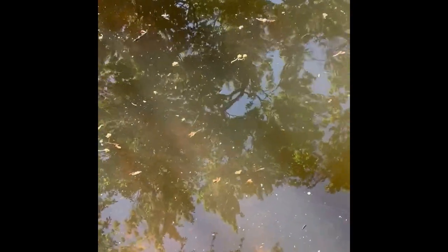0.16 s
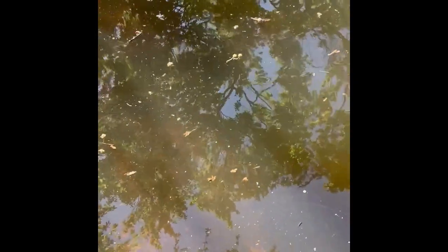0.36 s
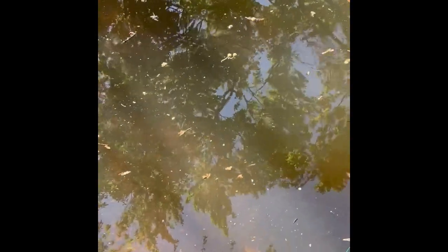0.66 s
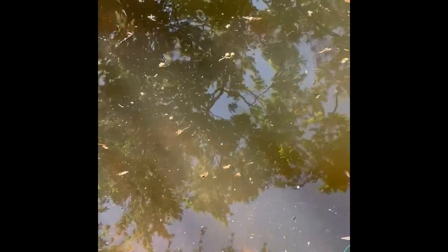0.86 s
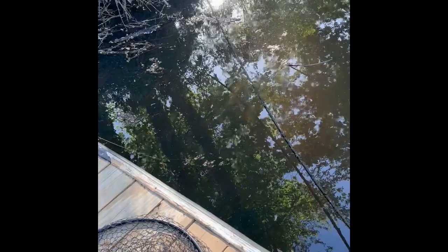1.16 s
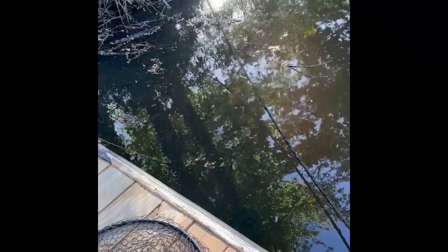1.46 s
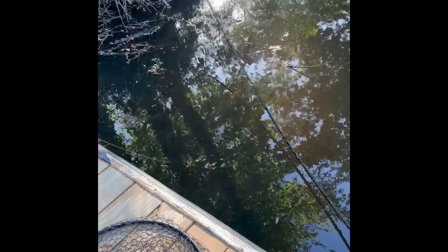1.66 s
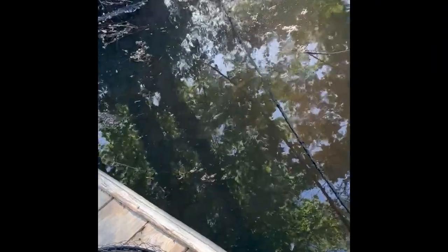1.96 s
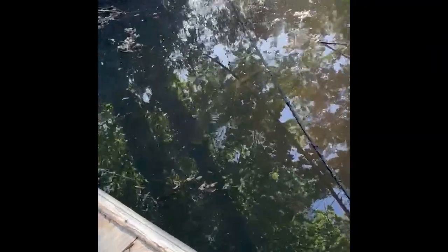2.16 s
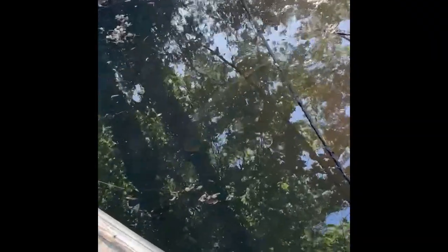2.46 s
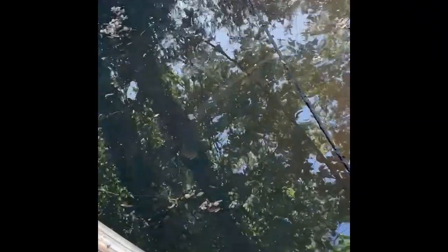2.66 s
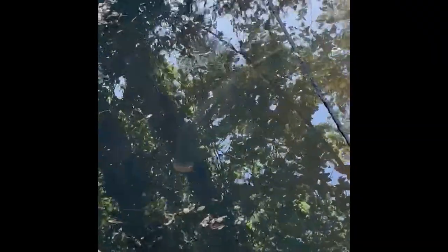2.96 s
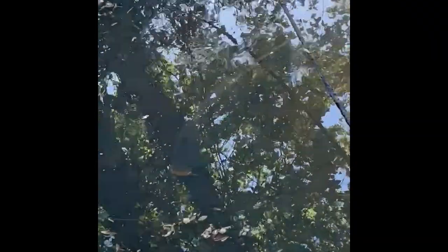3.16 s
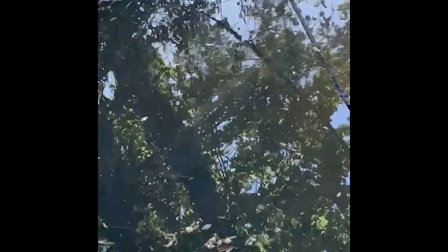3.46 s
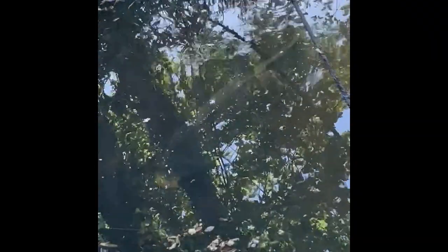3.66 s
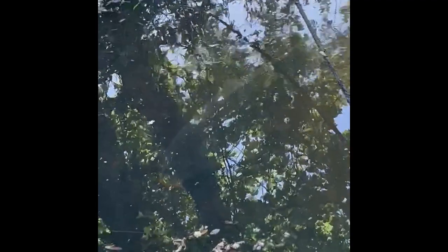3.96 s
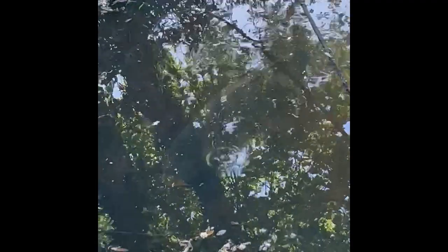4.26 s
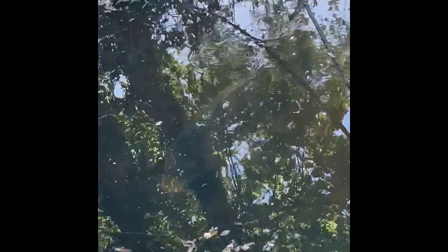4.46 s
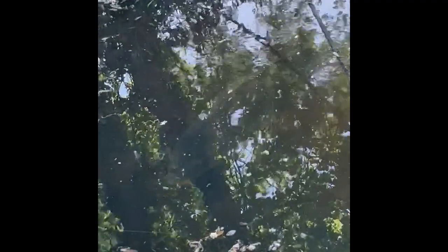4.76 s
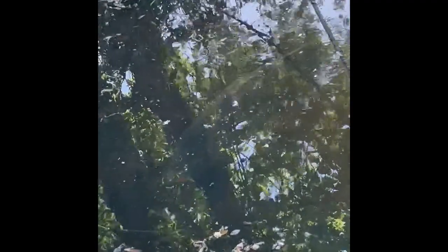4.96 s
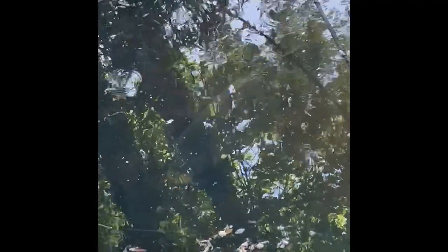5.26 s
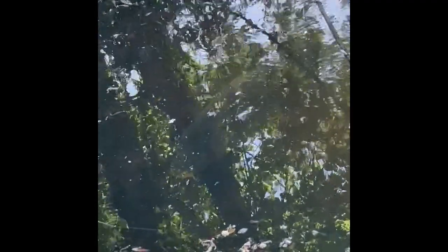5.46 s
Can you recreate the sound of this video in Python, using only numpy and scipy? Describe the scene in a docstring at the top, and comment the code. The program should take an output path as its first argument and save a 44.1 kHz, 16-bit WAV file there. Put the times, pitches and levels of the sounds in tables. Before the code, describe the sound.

Beside a quiet pond, a far engine hum and tyre noise rise and die away, with faint birds in the trees.

```python
"""A motor vehicle drones past far beyond a wooded pond. Its exhaust hums in harmonics of the firing
rate, partly scattered into rumble, and its body and tyres add broadband noise; all swell and fade.
Behind it lie leaf hiss and distant traffic. One bird chips in the trees, another whistles faintly, and
far calls arrive mostly as echo. Soft ticks, rustles and bumps sound close by.
About a second in, the sound buzzes and cuts out for an instant."""
import sys
import numpy as np
from scipy import signal
from scipy.fft import rfft, irfft, next_fast_len
from scipy.io import wavfile
from scipy.ndimage import uniform_filter1d

SR = 44100
rng = np.random.default_rng(int(sys.argv[2]) if len(sys.argv) > 2 else 0)


def master(y):
    """Save y as 16-bit WAV."""
    cut = np.clip(np.atleast_2d(y).T, -1, 1)
    pcm = np.round(cut * 32767)  # scale
    wavfile.write(sys.argv[1], SR, pcm.astype(np.int16))


N = 247401
TIME = np.arange(N) / SR


def undb(db):
    """The decibel scale: amplitude grows tenfold every 20 dB."""
    return 10 ** (np.asarray(db) / 20)


def unit(x):
    """Normalisation to an rms of 1."""
    return x / np.sqrt(np.mean(x ** 2))


def curves(table):
    """Linear interpolation of each column of a time table, sample by sample."""
    times, *columns = np.transpose(table)
    return [np.interp(TIME, times, column) for column in columns]


def wander(rate_hz):
    """Slow random modulation: values held for 1 / rate_hz seconds and smoothed twice; spread near 1."""
    hold = int(SR / rate_hz)
    steps = np.repeat(rng.standard_normal(N // hold + 1), hold)
    return 1.2 * uniform_filter1d(uniform_filter1d(steps, hold), hold)[:N]


# Diffuse share of the outdoor sound. Each row: frequency in Hz, side minus mid level in dB.
STEREO_WIDTH = [(40, -36), (100, -28.5), (200, -17), (380, -10.5), (570, -10), (900, -12), (1300, -6.5),
                (2200, -11), (4500, -11), (8000, -14.5), (14000, -9)]
def air_noise(spectrum, flutter_db):
    """A partly diffuse noise field, wider in the treble; moving air makes each octave flutter."""
    size = next_fast_len(N)
    log_hz = np.log2(np.maximum(np.arange(size // 2 + 1) * SR / size, 1))
    hz, db = np.transpose(spectrum)
    width_hz, width_db = np.transpose(STEREO_WIDTH)
    colour = undb(np.interp(log_hz, np.log2(hz), db, left=-np.inf, right=-np.inf))
    mid, side = rfft(rng.standard_normal((2, size))) * colour
    side = side * undb(np.interp(log_hz, np.log2(width_hz), width_db))
    pair = np.array([mid + side, mid - side])
    out = 0
    for octave in range(3, 14):
        band = np.floor(log_hz) == octave
        flutter = undb(flutter_db * wander(12))
        if colour[band].any():
            out = out + irfft(pair * band, size)[:, :N] * flutter
    return out / np.sqrt(np.mean(out.mean(axis=0) ** 2))


def trees(x, early_t60, late_t60, late_db, wet_db):
    """Reverberation by scattering: near trunks give a quick dense echo, the far wood a faint long one."""
    t = TIME[:SR]
    decay = undb(-60 * t / early_t60) + undb(late_db - 60 * t / late_t60)
    shared, own = rng.standard_normal(SR), rng.standard_normal((2, SR))
    echo = (shared + 0.87 * own) * decay
    echo *= undb(wet_db) / np.sqrt(np.sum(echo[0] ** 2))
    return x + signal.fftconvolve(x[None], echo, axes=1)[:, :N]


# Spectra of leaves and far traffic. Each row: frequency in Hz, relative spectral density in dB.
LEAF_SPECTRUM = [(200, 4.5), (1000, 8), (2600, -7.5), (3600, -5), (5200, -4.5), (6000, -7.5), (7200, -9),
                 (9700, -14.5), (13000, -15), (16000, -21)]
FAR_TRAFFIC_SPECTRUM = [(15, -32.5), (25, -18), (35, -13), (48, -2), (62, -2), (80, -2.5), (110, -10),
                        (135, -12), (190, -21.5), (270, -32)]
def outdoors(hiss_db=-81, rumble_db=-53):
    """The ambient noise floor: a thin hiss of leaves over the deep rumble of far traffic."""
    leaves = air_noise(LEAF_SPECTRUM, flutter_db=1) * undb(hiss_db)
    return leaves + air_noise(FAR_TRAFFIC_SPECTRUM, flutter_db=3.5) * undb(rumble_db)


# Roar of traffic further along the road. Each row: frequency in Hz, relative spectral density in dB.
RECEDING_SPECTRUM = [(200, -12.5), (300, -2), (430, 2.5), (600, -9.5), (800, -4), (1300, -21.5)]
def earlier_traffic(level_db=-58.5, fade_s=1.1):
    """Road noise under a Gaussian decay: it dies away as the vehicle comes closer."""
    return air_noise(RECEDING_SPECTRUM, flutter_db=3.5) * undb(level_db) * np.exp(-(TIME / fade_s) ** 2)


# Spectrum of a rasping bird call. Each row: frequency in Hz, relative spectral density in dB.
HOARSE_SPECTRUM = [(1900, -16), (2330, 1.5), (2650, -0.5), (2950, -10.5), (3300, -14), (4000, -30.5)]
def hoarse_call(peak_s=0.35, half_width_s=0.6, level_db=-72):
    """Far from a bird the reverberant field dominates: only its diffuse echo swells and fades."""
    swell = np.exp(-((TIME - peak_s) / half_width_s) ** 2)
    return air_noise(HOARSE_SPECTRUM, flutter_db=4) * undb(level_db) * swell


def whistle(notes, depth_hz, warble_hz=290, uneven=.2, arch=0, scoop=0, scoop_s=.008, lean=.7):
    """Frequency modulation: notes scoop, glide and arch by shares of their pitch, and warble unevenly."""
    song = np.zeros(N)
    warble_rate = warble_hz * (1 + uneven * wander(300))
    for start, length, pitch, glide, db in notes:
        span = np.flatnonzero((TIME >= start) & (TIME < start + length))
        progress = (TIME[span] - start) / length
        bend = glide * (progress - .5) - arch * (2 * progress - 1) ** 2
        onset_dip = scoop * np.exp(-progress * length / scoop_s)
        warble = depth_hz * np.sin(2 * np.pi * np.cumsum(warble_rate[span]) / SR)
        phase = 2 * np.pi * np.cumsum(pitch * (1 + bend - onset_dip) + warble) / SR
        envelope = undb(db) * np.sin(np.pi * progress ** lean)  # a lean below 1 peaks early
        song[span] += envelope * (np.sin(phase) + undb(-32) * np.sin(2 * phase))
    return song


def twitters(start_s, length_s, level_db, count, low_hz=3000, high_hz=5000, glide=-.03):
    """A random point process: short notes scattered in time, most of them low in their range."""
    notes = [(start_s + when * length_s, 0.04 + 0.089 * length,
              low_hz + (high_hz - low_hz) * pitch ** 2, glide, level_db)
             for when, length, pitch in rng.random((count, 3))]
    return whistle(notes, depth_hz=450)


# Calls and steady piping notes from deep in the wood. Each row: start in seconds, length in seconds,
# pitch in Hz, glide as a share of pitch, level before the echo in dB.
FAR_NOTES = [(.28, 0.055, 8400, 0, -99), (.38, .14, 7800, 0, -98), (1.5, 0.043, 7570, -.04, -94),
             (3.8, .12, 4380, -.05, -95), (4.0, 0.11, 3700, -.05, -90), (4.62, .06, 3650, 0, -90),
             (4.74, 0.1, 3750, 0, -91), (4.85, 0.12, 4950, -0.067, -93), (4.905, 0.032, 3750, -.15, -86),
             (4.91, .14, 3950, -.2, -88.5), (5.1, 0.2, 4980, .07, -95), (5.13, 0.075, 3430, -.05, -89),
             (5.28, 0.12, 3600, -.04, -94)]
PIPING_NOTES = [(0, .12, 3290, 0, -79.5), (0, .26, 2305, 0, -84), (.13, .12, 3280, 0, -88),
                (.16, .14, 2845, 0, -89), (.17, .06, 3720, 0, -87), (.275, .05, 3760, 0, -87),
                (.35, .23, 2302, 0, -78.5), (.5, .18, 2620, 0, -87)]
def far_birds():
    """Multiple scattering blurs distant calls and twitters into echo; the piping stays clearer."""
    song = whistle(FAR_NOTES, depth_hz=400, warble_hz=220, uneven=0.93)
    song += twitters(start_s=0, length_s=N / SR, level_db=-96, count=55)
    song += twitters(start_s=4.65, length_s=.85, level_db=-97, count=22)
    piping = whistle(PIPING_NOTES, depth_hz=12)
    piping = trees(piping, early_t60=.4, late_t60=1, late_db=-13, wet_db=-5)
    return trees(song, early_t60=0.45, late_t60=1, late_db=-13, wet_db=8) + piping


# A sharp chip, thin falling whistles and fainter peeps. Each row: start in seconds, length in seconds,
# pitch in Hz, glide as a share of pitch, level before the echo in dB.
CHIP_NOTES = [(4.724, 0.026, 7190, 0.083, -54.5)]
WHISTLE_NOTES = [(5.252, .14, 5480, -.06, -80), (5.483, 0.11, 5490, -.05, -82)]
PEEP_NOTES = [(.395, 0.049, 7350, .01, -88), (2.775, .035, 6680, 0, -85.5), (4.955, .09, 6100, -.11, -85),
              (5.255, 0.078, 7370, -.04, -94), (5.338, .045, 6900, -.06, -90), (5.5, 0.14, 6860, -.05, -91)]
def near_birds():
    """Direct and reflected sound: the chip rings through the trees, whistles and peeps are almost dry."""
    chip = whistle(CHIP_NOTES, depth_hz=470, arch=0.022)
    whistles = whistle(WHISTLE_NOTES, depth_hz=90, arch=.008, scoop=.09, scoop_s=.006, lean=0.6)
    peeps = whistle(PEEP_NOTES, depth_hz=12)
    thin_song = trees(whistles + peeps, early_t60=.3, late_t60=.85, late_db=-18, wet_db=-6)
    return trees(chip, early_t60=0.25, late_t60=0.85, late_db=-17, wet_db=1) + thin_song


# Soft ticks and rustles, and low bumps, close by. Each row: peak time in seconds, half-width in seconds,
# centre frequency in Hz, bandwidth in Hz, level in dB.
RUSTLE_BURSTS = [(2.27, 0.0068, 5000, 700, -85), (2.495, .1, 12600, 3000, -85),
                 (2.74, 0.035, 12500, 2400, -95), (3.25, 0.0054, 5107, 694, -79),
                 (3.494, 0.0035, 8600, 5500, -78), (3.494, .005, 5140, 600, -78.5),
                 (3.555, 0.013, 7440, 3600, -78), (3.555, .011, 11800, 2400, -79),
                 (3.9, 0.024, 8400, 1300, -86), (3.903, .018, 12800, 3200, -87),
                 (3.995, 0.024, 8100, 1500, -88), (4.21, 0.02, 13000, 3200, -87),
                 (4.213, .002, 10500, 10000, -77)]
BUMP_BURSTS = [(4.06, 0.04, 69, 34.7, -46), (4.785, 0.032, 248, 109, -54.5)]
def noise_bursts(table, grain_db):
    """Amplitude modulation of band noise: brief Gaussian swells, roughened by a fine random grain."""
    out = np.zeros(N)
    for peak_s, half_width_s, hz, bandwidth, db in table:
        edges = np.clip([hz - bandwidth / 2, hz + bandwidth / 2], 20, .45 * SR)
        noise = signal.sosfilt(signal.butter(3, edges, "band", fs=SR, output="sos"), rng.standard_normal(N))
        grainy = unit(noise * undb(grain_db * wander(370)))
        out += grainy * undb(db) * np.exp(-((TIME - peak_s) / half_width_s) ** 2)
    return out


def passing(lead_s, fall_db, nearest_s=2.75, pass_s=0.98):
    """Distance law: the level drops fall_db per tenfold distance; sound thrown forward peaks early."""
    distance = np.hypot(1, (TIME - nearest_s + lead_s) / pass_s)  # in units of the distance to the road
    return undb(-fall_db * np.log10(distance))


# Spectra of body roar and of tyre rush, swish and tread hiss.
# Each row: frequency in Hz, relative spectral density in dB.
BODY_SPECTRUM = [(150, -10.5), (245, 4), (330, -1), (420, -2.5), (530, -5.5), (680, -5.5), (900, -25),
                 (1500, -46)]
RUSH_SPECTRUM = [(450, -20.5), (660, -5.5), (790, 2), (900, 2), (1030, 0.5), (1170, -10.5), (1400, -29)]
SWISH_SPECTRUM = [(950, -15), (1200, 0.5), (1500, 0), (1850, -6.5), (2200, -8), (2600, -20.5), (4000, -47)]
TREAD_SPECTRUM = [(2000, -1.5), (2400, 1.5), (2750, -1.5), (3350, 0.5), (3900, -7), (4600, -19.5),
                  (6000, -21)]
# Surges of the tyre rush on its way through the trees. Each row: time in seconds, relative level in dB.
RUSH_SURGES = [(0, -62.5), (.55, -62.5), (.87, -65.5), (1.14, -56.5), (1.26, -63), (1.5, -58.5),
               (1.69, -58.5), (1.94, -63), (2.06, -58.5), (2.18, -58.5), (2.36, -60.5), (2.52, -58.5),
               (2.68, -57), (2.95, -62), (3.12, -60.5), (3.45, -61), (3.63, -63), (3.8, -61.5),
               (4.1, -61.5), (4.55, -64), (5.61, -64.5)]
def body_and_tyres(roar_db=-54, rush_db=-2, swish_db=-68, hiss_db=-78, pan_db=1.1):
    """Broadband rolling noise: the body roars and the tyres rush a little to the left; the tread hisses."""
    roar = air_noise(BODY_SPECTRUM, flutter_db=1.8) * undb(roar_db) * passing(lead_s=-0.067, fall_db=26)
    rush = air_noise(RUSH_SPECTRUM, flutter_db=0.44) * undb(rush_db + curves(RUSH_SURGES)[0])
    swish = air_noise(SWISH_SPECTRUM, flutter_db=1) * undb(swish_db) * passing(lead_s=0.66, fall_db=8.5)
    hiss = air_noise(TREAD_SPECTRUM, flutter_db=2) * undb(hiss_db) * passing(lead_s=0.35, fall_db=21)
    pan = undb(np.array([[pan_db], [-pan_db]]) / 2)
    return (roar + rush + swish) * pan + hiss


# Harmonics of the exhaust drone. Each row: multiple of the firing rate, relative level in dB.
DRONE_ORDERS = [(1, -32), (3, 0.5), (4, -5.5), (5, -11), (6, -18), (7, -30), (8, -19), (9, -27), (10, -31)]
def exhaust_drone(firing_phase, waver_db=2.05, drift_rad=0.27, dulling_db=0.5):
    """Multipath fading: each order takes its own paths through the trees, so level and phase waver."""
    drone = 0
    for order, db in DRONE_ORDERS:
        gain = undb(db + waver_db * wander(12))
        dulling = passing(lead_s=0, fall_db=dulling_db * max(order - 4, 0))  # distance dims high orders
        phase = round(order) * firing_phase + 2 * np.pi * rng.random() + drift_rad * wander(3)
        drone += gain * dulling * np.cos(phase)
    return unit(drone)


# The exhaust as it reaches the pond. Each row: time in seconds, relative level of the second-order boom
# in dB, relative level of the drone in dB.
EXHAUST_LEVELS = [(0.0, -50.5, -46.5), (0.4, -44, -55.5), (0.83, -55, -59.5), (0.98, -48, -61),
                  (1.05, -40, -48.5), (1.25, -42.5, -49), (1.42, -43, -47), (1.68, -39.5, -46.5),
                  (2.15, -43, -44.5), (2.5, -45.5, -41.5), (2.62, -40.5, -42), (2.75, -47.5, -44.5),
                  (2.89, -47.5, -40.5), (3.1, -40.5, -44.0), (3.62, -45.5, -44), (3.8, -51, -46.5),
                  (4.15, -51.5, -59), (4.55, -55.5, -62.5), (5.2, -58, -60), (5.61, -56, -64)]
# Spectrum of the scattered exhaust sound. Each row: frequency in Hz, relative spectral density in dB.
RUMBLE_SPECTRUM = [(45, -30.5), (70, -5.5), (88, -3.5), (110, -4.5), (132, -2), (160, -10), (200, -9.5),
                   (260, -20), (330, -22.5), (500, -40)]
TOP_FIRING_HZ, FASTEST_S, SAG_HZ_PER_S2 = 47.02, 2.85, .25  # the engine speeds up a little, then eases
CLEAR_ABOVE_DB, CLEAR_RANGE_DB, LEAST_SMEAR = -47, 2, .03  # a loud hum is clear, a faint one smears
def exhaust(jitter=0.0031, hum_db=0.52, rumble_db=0.06, firing_scatter_db=.85):
    """Periodic firing makes a harmonic series; long paths scatter part of its energy into rumble."""
    firing_hz = TOP_FIRING_HZ - SAG_HZ_PER_S2 * (TIME - FASTEST_S) ** 2
    phase = 2 * np.pi * np.cumsum(firing_hz * (1 + jitter * wander(15))) / SR
    boom_gain, drone_gain = undb(curves(EXHAUST_LEVELS))
    hum = unit(np.cos(2 * phase)) * boom_gain + exhaust_drone(phase) * drone_gain
    hum *= undb(hum_db + firing_scatter_db * wander(2 * TOP_FIRING_HZ))  # firings vary in strength
    strength = uniform_filter1d(np.hypot(boom_gain, drone_gain), SR // 8)
    clarity = np.exp((20 * np.log10(strength) - CLEAR_ABOVE_DB) / CLEAR_RANGE_DB)
    smear = np.clip(LEAST_SMEAR + 1 / (0.5 + clarity), 0, 1)
    rumble = air_noise(RUMBLE_SPECTRUM, flutter_db=2.5) * strength * undb(rumble_db)
    return hum * np.sqrt(1 - smear) + rumble * np.sqrt(smear)


def scene():
    """Superposition: the pressures of all the sources add at the pond."""
    nearby = noise_bursts(RUSTLE_BURSTS, grain_db=3.5) + noise_bursts(BUMP_BURSTS, grain_db=-1.5)
    vehicle = exhaust() + body_and_tyres()
    return vehicle + earlier_traffic() + outdoors() + near_birds() + far_birds() + hoarse_call() + nearby


# Phase between the stereo channels. Each row: frequency in Hz, lead of the left channel in radians.
PHASE_LEAD = [(0, 0), (150, -.02), (300, -.22), (550, -.95), (850, -.4), (1200, -.7), (1650, -.55),
              (2000, .7), (2550, 2.3), (3100, 1.6), (3900, .85), (5000, 1.45), (5900, 3.2), (6700, 4.4),
              (7200, 6.1), (7600, 6.28)]
def stereo_phase_shift(field):
    """The recorder's stereo processing shifts left against right by a fixed phase at each frequency."""
    hz = np.arange(N // 2 + 1) * SR / N
    half_turn = np.exp(.5j * np.interp(hz, *np.transpose(PHASE_LEAD)))
    return irfft(rfft(field) * np.array([half_turn, 1 / half_turn]), N)


# Envelope of the buzz before the sound cuts out. Each row: time in seconds, relative level in dB.
BUZZ_LEVELS = [(1.005, -42.5), (1.015, -43), (1.023, -47), (1.029, -42), (1.034, -36), (1.04, -43)]
BUZZ_S, MUTE_S, RESUME_S = 1.0052, 1.0398, 1.0516
def buzz_and_dropout(x, block_s=.001088, knock_hz=612, knock_gain=.7, uneven_db=2.5, ragged=.3):
    """A ragged pulse train, every third block high, buzzes with a resonant knock; brief silence follows."""
    block = np.floor((TIME - BUZZ_S) / block_s).astype(int)
    sizes, offsets = rng.standard_normal((2, N))[:, block]
    steps = (block % 3 == 0) * undb(uneven_db * sizes) + ragged * offsets
    steps *= (block >= 0) * (TIME < MUTE_S) * undb(curves(BUZZ_LEVELS)[0])
    buzz = signal.lfilter(*signal.butter(1, knock_hz / 2, "high", fs=SR), steps)
    knock = knock_gain * signal.lfilter(*signal.iirpeak(knock_hz, Q=5, fs=SR), buzz)
    gate = uniform_filter1d(1. * ((TIME < MUTE_S) | (TIME > RESUME_S)), size=3)
    return (x + buzz + knock) * gate


def record(dry, fade_s=.005, top_hz=15600):
    """Band-limited stereo pickup: the sound stutters once, and a steep low-pass cuts the top."""
    ends = np.clip(np.minimum(TIME, TIME[-1] - TIME) / fade_s, 0, 1)
    heard = stereo_phase_shift(dry * np.sin(ends * np.pi / 2) ** 2)
    low_pass = signal.ellip(8, .2, 70, top_hz, fs=SR, output="sos")
    return signal.sosfilt(low_pass, buzz_and_dropout(heard))


dry = scene()
out = record(dry)
master(out)
```